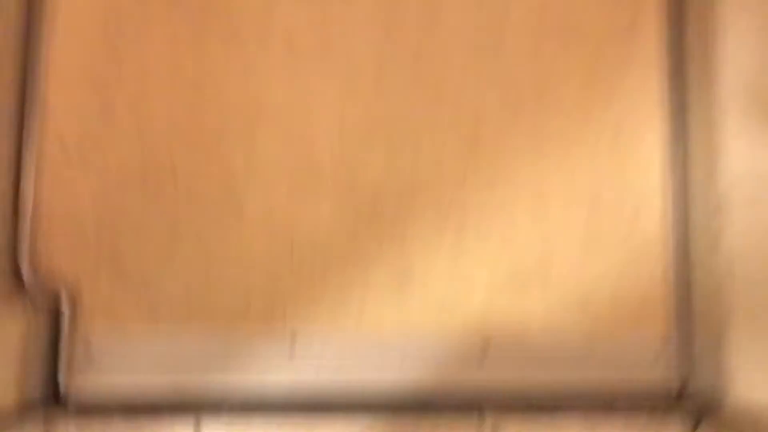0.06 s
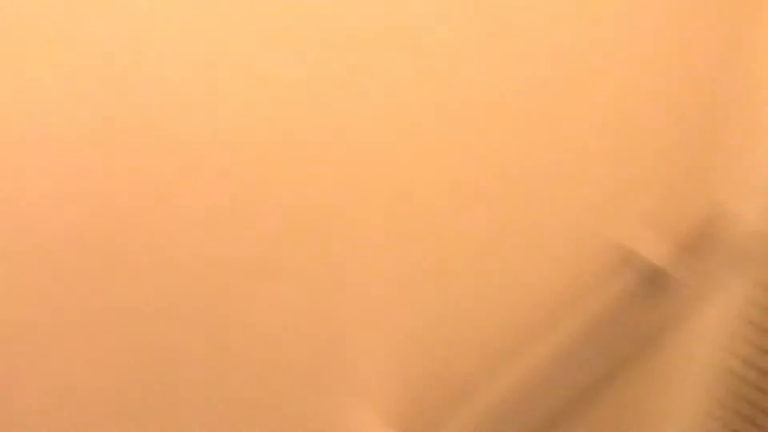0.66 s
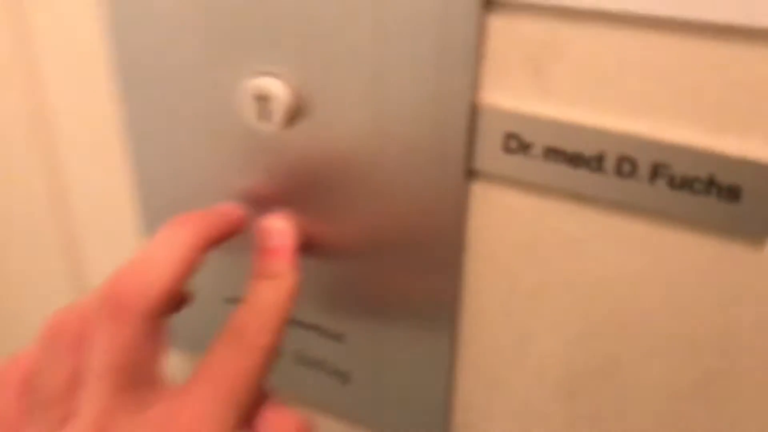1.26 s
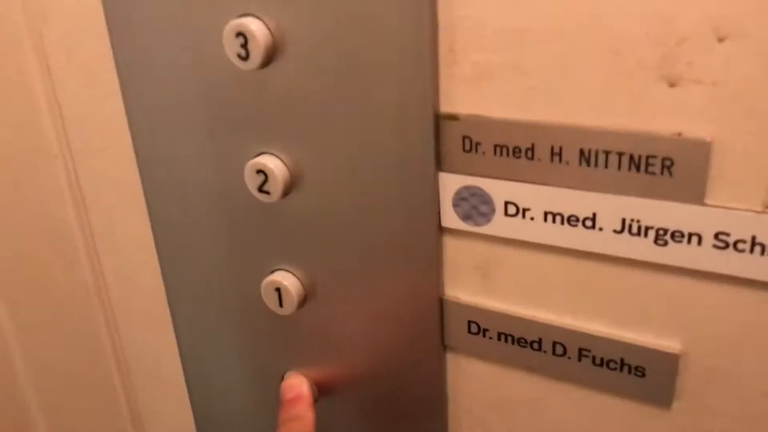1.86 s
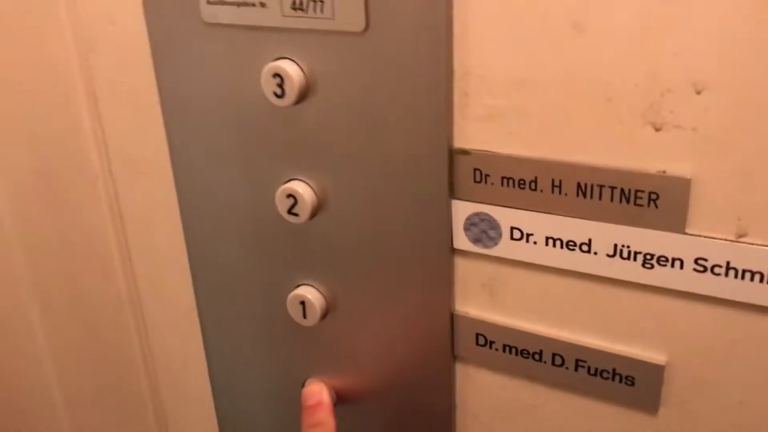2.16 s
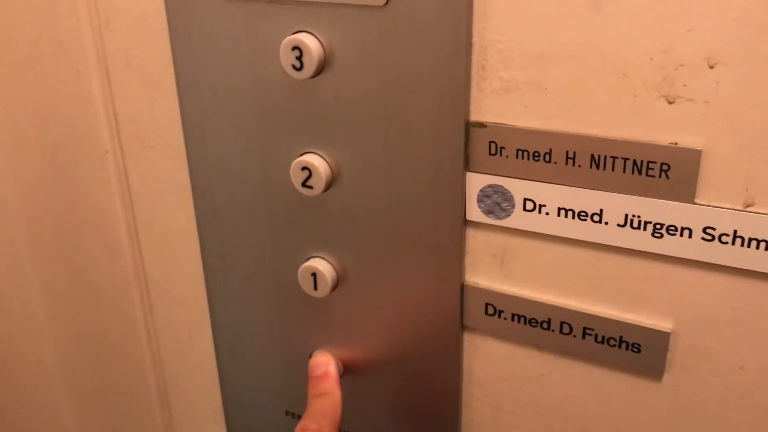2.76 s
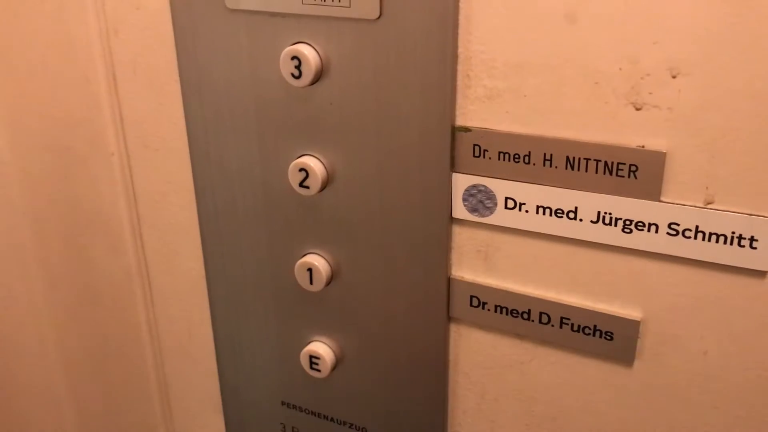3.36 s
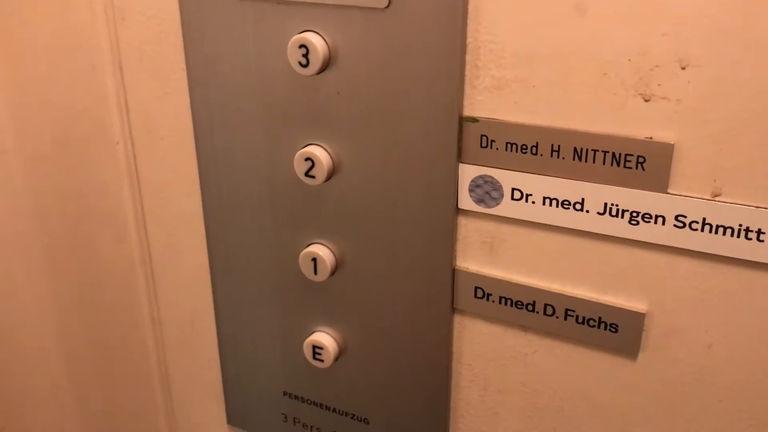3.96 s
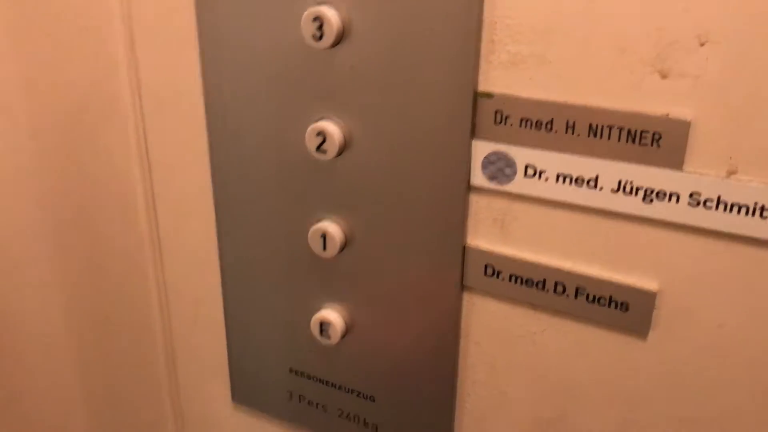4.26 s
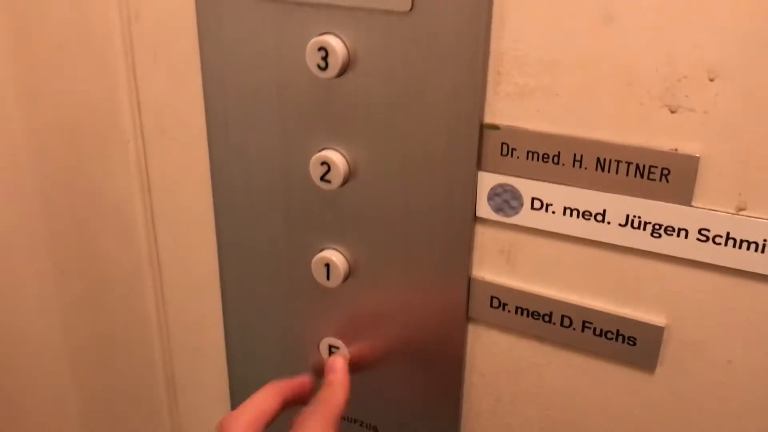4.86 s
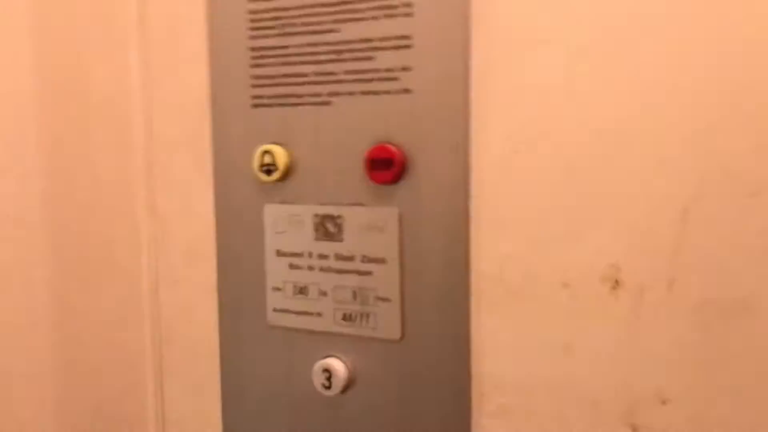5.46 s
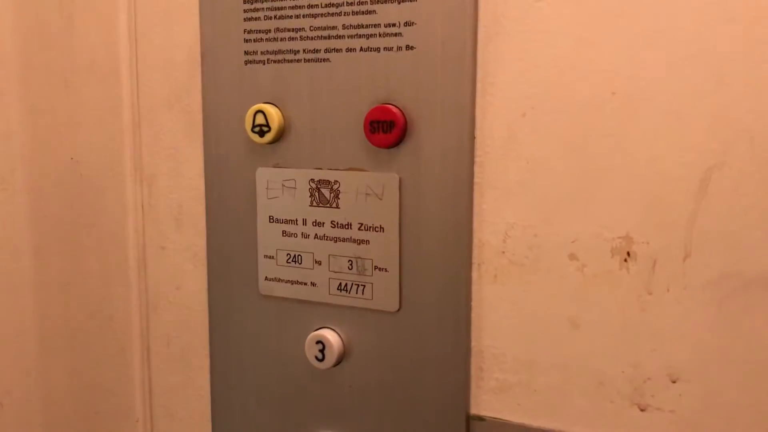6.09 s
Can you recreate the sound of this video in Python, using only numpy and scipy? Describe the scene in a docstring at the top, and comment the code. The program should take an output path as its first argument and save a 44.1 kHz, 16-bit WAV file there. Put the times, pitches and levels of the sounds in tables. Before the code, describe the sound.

Someone steps into a rattling lift cab and clicks buttons before it starts with a metallic crash and a surging low hum.

```python
"""The hoist motor of a small old lift hums in surges as the brake lets go with a crash and the cab starts.
Before that, someone steps in: the hanging cab booms, floor boards rattle, soles and a sleeve rub.
Buttons and shoes click, a relay ticks and the door lock clanks. Blows are decaying band noise
shaped by resonances, ringing on in the cab and the shaft; the boom and the walls are decaying sines."""
import sys
import numpy as np
from scipy import signal
from scipy.io import wavfile
from scipy.ndimage import uniform_filter1d

SR = 44100
rng = np.random.default_rng(int(sys.argv[2]) if len(sys.argv) > 2 else 0)


def wav_out(sig):
    """Save sig, one row per channel (or a flat mono array), as 16-bit PCM at SR to the path in sys.argv[1]."""
    wavfile.write(sys.argv[1], SR, np.round(np.clip(np.atleast_2d(sig).T, -1, 1) * 32767).astype(np.int16))


N = 274433
T = np.arange(N) / SR
STEP = 16   # samples per envelope step
BAND_HZ = 16000 / 2 ** (np.arange(27, -1, -1) / 3)
# Frequencies at which a contact's tone is given, in Hz.
TONE_HZ = [250, 800, 2500, 7000, 13000]


def from_db(db):
    """Decibels to gain."""
    return 10 ** (np.asarray(db) / 20)


def rms_one(x):
    """Scale to rms 1."""
    return x / np.sqrt(np.mean(x ** 2) + 1e-20)


def add(out, start_s, sound):
    """Mix a sound in from a given time."""
    at = max(round(start_s * SR), 0)
    out[at:at + len(sound)] += sound[:N - at]


def per_band(points):
    """A curve over frequency, read at the band centres, as a column."""
    hz, value = np.transpose(list(points))
    return np.interp(np.log(BAND_HZ), np.log(hz), value)[:, None]


def noise_bands():
    """Third-octave bands of noise, rms 1 each; neighbours are unrelated."""
    white = rng.standard_normal((2, N))
    edge = 2 ** (1 / 6)
    filters = [signal.butter(2, [hz / edge, hz * edge], "band", fs=SR, output="sos") for hz in BAND_HZ]
    return np.array([rms_one(signal.sosfilt(sos, white[k % 2])) for k, sos in enumerate(filters)])


def coloured(noise, spectrum):
    """Steady noise of rms 1, shaped by a spectral density in dB."""
    gains = from_db(per_band(spectrum))[:, 0] * np.sqrt(BAND_HZ)
    return rms_one(gains @ noise)


def resonate(x, hz, width_hz):
    """One resonance, peak gain 1."""
    return signal.lfilter(*signal.iirpeak(hz, hz / width_hz, fs=SR), x)


def body(x, resonances):
    """An object's resonances and the hollows between them."""
    for hz, width_hz, lift_db in resonances:
        x = x + (from_db(lift_db) - 1) * resonate(x, hz, width_hz)
    return x


def ring(hz, db, t60_s):
    """One struck mode: a decaying sine."""
    t = T[:3 * SR]
    return from_db(db - 60 * t / t60_s) * np.sin(2 * np.pi * hz * t)


def waver(depth_db, step_s=0.06):
    """A gain that wanders at random."""
    steps = rng.standard_normal(400)
    return from_db(depth_db * np.interp(T / step_s, np.arange(len(steps)), steps))


def grain(depth_db, samples):
    """A gain that flickers quickly."""
    return from_db(depth_db * rms_one(uniform_filter1d(rng.standard_normal(N), size=samples)))


def crackle(per_s, size_db, decay_s=0.002):
    """Small catches in a rubbing contact: a gain that spikes at random moments."""
    catches = (rng.random(N) < per_s / SR) * rng.uniform(0.4, 1, N)
    spikes = signal.lfilter([1], [1, -np.exp(-1 / (decay_s * SR))], catches + 1e-18)
    return from_db(size_db) * spikes


def since(start_s):
    """Seconds since an event, per envelope step; zero before it."""
    return np.maximum(T[::STEP] - start_s, 0)


def dying(age_s, t60_s, rise_s):
    """Power of a sound that builds up and dies away."""
    attack = 1 - np.exp(-age_s / rise_s)
    return attack ** 2 * np.exp(-np.minimum(np.log(1e6) * age_s / t60_s, 60))


def strokes(rows, attack_s, release_t60_s, sag_db_per_s=0):
    """Gain of a run of strokes: each swells, holds or sags for its length, then dies away."""
    power = 0
    for start_s, length_s, db in rows:
        age_s = since(start_s)
        fall_db = sag_db_per_s * age_s + 60 * np.maximum(age_s - length_s, 0) / release_t60_s
        attack = np.minimum(age_s / attack_s, 1)
        power = power + (from_db(db - np.minimum(fall_db, 200)) * attack) ** 2
    return np.interp(T, T[::STEP], np.sqrt(power))


def reflections(noise, power):
    """Dense reflections: noise follows a power envelope per band, grainier in the treble."""
    uneven = rms_one(grain(depth_db=2, samples=24))
    out, shift = np.zeros(N), rng.integers(N)
    for hz, band, gain in zip(BAND_HZ, noise, np.sqrt(power)):
        out += np.roll(band, shift) * np.repeat(gain, STEP)[:N] * (uneven if hz > TONE_HZ[2] else 1)
    return out


def contact_power(tone_db, bass_hz=130):
    """Power per band of a contact, falling away in the bass."""
    return from_db(per_band(zip(TONE_HZ, tone_db))) ** 2 / (1 + (bass_hz / BAND_HZ[:, None]) ** 4)


# Shaft reverberation. Each row: frequency in Hz, t60 in seconds.
SHAFT_T60 = [(100, 0.73), (400, 1.73), (1100, 1.15), (3000, 0.77), (7500, 0.49), (14000, 0.42)]

def blow(start_s, t60_s, rise_s, tone_db, shaft_db, damping):
    """Power per band: a decay in the cab, shorter in the treble, then the shaft's tail."""
    age_s = since(start_s)
    cab = dying(age_s, t60_s * (BAND_HZ[:, None] / TONE_HZ[2]) ** -damping, rise_s)
    shaft = from_db(shaft_db) ** 2 * dying(age_s, per_band(SHAFT_T60), rise_s=0.085)
    return contact_power(tone_db) * (cab + shaft)


def clanks(noise, hits, resonances, shaft_db, damping):
    """Blows heard through the resonances of what they strike."""
    power = sum(blow(start_s, t60_s, rise_s, tone_db, shaft_db, damping)
                for start_s, t60_s, rise_s, *tone_db in hits)
    return body(reflections(noise, power), resonances)


# Wall echoes. Each row: delay in seconds, gain in dB.
ECHOES = [(.0123, -14), (.0191, -13), (.0263, -14), (.0347, -16)]

def wall_echoes(x):
    """The close walls throw each blow back with a boxy ring, at about the same power."""
    out = x.copy()
    for delay_s, db in ECHOES:
        add(out, delay_s, from_db(db) * x)
    return out / np.sqrt(1 + sum(from_db(db) ** 2 for _, db in ECHOES))


# Air spectrum. Each row: frequency in Hz, relative density in dB.
AIR_SPECTRUM = [(18, -33), (30, 10), (64, -10), (109, -14), (170, -21.5), (239, -3.5), (273, -22),
                (889, -44), (1010, -36), (1100, -19), (7670, -32.5), (12600, -35), (16000, -56)]

def air(noise, level_db=-61.5):
    """The still air of the stairwell and shaft."""
    return from_db(level_db) * np.roll(coloured(noise, AIR_SPECTRUM), SR)


# Guide shoe spectrum. Each row: frequency in Hz, relative density in dB.
GUIDE_SPECTRUM = [(100, -21), (170, -2.5), (331, -7), (371, -10), (475, -10), (512, -10.5), (668, -7),
                  (1050, -11.5), (1730, -25.5), (2530, -27), (4150, -24.5), (8540, -30.5), (16000, -44)]
# Cab rumble, also used by thumps. Each row: frequency in Hz, relative third-octave level in dB.
RUMBLE_SPECTRUM = [(25, -22.5), (40, -6.5), (60, 2.5), (85, 9), (115, -15), (160, -31), (300, -59),
                   (600, -90)]

def travel(noise, depart_s=5.01, shoes_db=-53, rumble_db=-51):
    """Guide shoes rub unevenly on the rails and the cab rumbles, both growing with its speed."""
    speed = np.maximum(T - depart_s, 0)   # the levels apply one second after departure
    shoes = coloured(noise, GUIDE_SPECTRUM) * waver(depth_db=-0.3) * (1 + crackle(per_s=8.8, size_db=-1))
    rumble = rms_one(from_db(per_band(RUMBLE_SPECTRUM))[:, 0] @ noise)
    return speed * (from_db(shoes_db) * shoes + from_db(rumble_db) * rumble)


# Strokes of sleeve, fingers and soles. Each row: start in seconds, length in seconds, level in dB.
SLEEVE_STROKES = [(.94, 0.13, -52.5), (1.05, 0.4, -44.5)]
FINGER_STROKES = [(.96, 0.13, -49), (1.045, .08, -41), (1.13, .15, -49), (1.91, 0.039, -68),
                  (2.03, 0.038, -60)]
SOLE_STROKES = [(-.05, 0.33, -50), (.3, 0.36, -45.5), (.75, 1.08, -55), (2.27, 0.08, -63),
                (2.96, 0.099, -65), (3.32, 0.052, -59), (3.44, 0.033, -60.5), (4.17, 0.039, -59),
                (4.41, 0.12, -57)]
# Their friction spectra. Each row: frequency in Hz, relative density in dB.
CLOTH_SPECTRUM = [(290, -19), (500, -3.5), (708, -4.5), (784, -3), (880, -11), (1060, 1), (2010, -3.5),
                  (6330, -6), (11800, -17), (16000, -28)]
SKIN_SPECTRUM = [(2000, -34), (4000, -0.5), (6200, 3.5), (9000, -3.5), (12000, -1), (16000, -20)]
SOLE_SPECTRUM = [(76, -38.5), (130, -8.5), (169, -20), (511, -24.5), (692, -24), (974, -25), (1060, -24.5),
                 (1710, -32.5), (6340, -42), (10500, -49.5), (14800, -52), (16000, -51.5)]

def rubbing(noise, stir_db=-68):
    """A sleeve brushes past, fingers slide on the panel and soles shuffle, never quite still."""
    texture = grain(depth_db=-0.5, samples=200)
    hiss = np.roll(coloured(noise, SKIN_SPECTRUM), -SR)
    sleeve = strokes(SLEEVE_STROKES, attack_s=0.018, release_t60_s=0.36) * coloured(noise, CLOTH_SPECTRUM)
    fingers = strokes(FINGER_STROKES, attack_s=0.0096, release_t60_s=0.13) * hiss
    sole_gain = strokes(SOLE_STROKES, attack_s=0.035, release_t60_s=0.46) + from_db(stir_db)
    scuff = coloured(noise[:, ::-1], SOLE_SPECTRUM) + crackle(per_s=18, size_db=-2) * hiss
    return texture * (sleeve + fingers + sole_gain * scuff)


# Squeaks. Each row: middle in seconds, half length in seconds, pitch in Hz, width in Hz, level in dB.
SQUEAKS = [(0.198, 0.024, 543, 59.7, -46), (0.205, 0.026, 1090, 250, -49), (0.991, 0.022, 6500, 1100, -47),
           (1.42, 0.013, 523, 39.8, -41), (3.895, 0.11, 3460, 447, -62), (3.098, 0.012, 3150, 110, -48.5),
           (4.732, 0.0061, 3140, 150, -38), (4.783, 0.04, 2440, 600, -45.5),
           (4.981, 0.013, 2040, 252, -27.5)]

def squeaks():
    """Brief friction of soles, cloth or sliding metal excites one narrow resonance."""
    out = np.zeros(N)
    for middle_s, half_s, hz, width_hz, db in SQUEAKS:
        swell = np.exp(-np.minimum(((T - middle_s) / half_s) ** 2 / 2, 50))
        rub = resonate(resonate(rng.standard_normal(N), hz, width_hz), hz, width_hz) * swell
        out += from_db(db) * rub * np.sqrt(np.sum(swell ** 2) / np.sum(rub ** 2))
    return out


# Relay tick. Each row: start, t60 and rise in seconds, then level in dB at each TONE_HZ.
RELAY_HITS = [(2.550, 0.29, 0.0012, -79, -64, -59.5, -76, -59.5)]
# Relay resonances. Each row: frequency in Hz, width in Hz, lift in dB.
RELAY_BODY = [(1310, 47, 19), (1493, 29, 15.5), (2150, 52, 9.5), (2835, 70, 16), (3570, 700, -17),
              (6170, 360, 11.5), (8770, 170, 22), (9160, 200, 8), (10200, 300, 12.5), (13700, 200, 8)]
# Spring modes. Each row: frequency in Hz, level in dB, t60 in seconds.
RELAY_SPRING = [(1320, -58, 0.38), (2850, -62, 0.51), (8900, -61, .45)]

def relay(noise):
    """A relay ticks and its spring rings on."""
    out = clanks(noise, RELAY_HITS, RELAY_BODY, shaft_db=-14.5, damping=0.12)
    for start_s, *_ in RELAY_HITS:
        add(out, start_s, sum(ring(*mode) for mode in RELAY_SPRING))
    return out


# Clicks of buttons, fingers and shoes. Each row: start in seconds, t60 in seconds, relative crack in dB,
# level in dB, tilt in dB per octave, bite (favoured band) in Hz, its lift in dB.
CLICKS = [ (0.898, 0.29, -1, -60.5, -5, 1200, -2), (0.907, 0.094, 5, -54.5, 1, 1320, 9),
          (1.119, 0.057, 4, -49.5, 0, 6000, 7), (1.128, 0.057, 7, -44, -1, 4000, 7.5),
          (1.399, .1, 4, -47.5, -1.5, 1180, 3), (1.800, 0.088, -2, -86, -1, 7060, 6.5),
          (1.912, 0.61, -4, -68, -3, 9600, 11), (2.029, 0.23, 4, -74, 1.5, 6840, 9),
          (3.054, .45, 0.5, -65.5, -3, 2540, 6), (3.072, 0.26, -5, -55.5, 4, 7800, 5.5),
          (3.082, 0.28, 8.5, -56, -1.5, 1500, 4.5), (4.118, 0.096, -3, -79, 2, 9150, 6),
          (4.620, 0.24, -1.5, -44.5, 1, 4700, 7), (4.624, .05, 5, -46, 3, 4570, 7.5),
          (4.683, 0.26, 0, -56, -1.5, 5500, 9), (4.723, 0.14, 4, -56.5, -1.5, 3500, 9),
          (4.738, 0.21, 7.5, -52.5, -0.5, 5530, 13.5), (4.765, 0.18, 7.5, -49.5, -1, 4360, 7)]
# Tone shared by all clicks: relative level in dB at each TONE_HZ.
CLICK_TONE_DB = [-6.5, -3, 2, 0.5, -1]
# Metallic ring of the clicks. Each row: frequency in Hz, width in Hz, lift in dB.
CLICK_BODY = [(325, 12, 7), (494, 20, 3), (800, 29, 6.5), (925, 20, -0.5), (1070, 82, 6.5), (1250, 47, 4),
              (1820, 71, -11), (2320, 60, 2.5), (3140, 45, 10.5), (3600, 220, -1.5), (3950, 130, 6),
              (5100, 35, -7), (5930, 90, 8.5), (6860, 120, 4), (9000, 830, 7), (10500, 610, 2),
              (13100, 650, -13)]

def clicks(noise, bite_half_width_oct=0.3):
    """Sharp near clicks with a metallic ring: a direct crack, then the cab's reflections."""
    power, octaves = 0, np.log2(np.divide(TONE_HZ, TONE_HZ[2]))
    for start_s, t60_s, crack_db, db, tilt_db_per_oct, bite_hz, bite_db in CLICKS:
        tone_db = db + np.array(CLICK_TONE_DB) + tilt_db_per_oct * octaves
        off_centre = np.log2(BAND_HZ[:, None] / bite_hz) / bite_half_width_oct
        bite = from_db(bite_db * np.exp(-0.5 * off_centre ** 2))
        crack = from_db(crack_db) ** 2 * dying(since(start_s), t60_s=0.018, rise_s=0.0001)
        tail = blow(start_s, t60_s, rise_s=0.0016, tone_db=tone_db, shaft_db=-12, damping=0.3)
        power = power + bite ** 2 * (contact_power(tone_db) * crack + tail)
    return body(reflections(noise, power), CLICK_BODY)


# Lock blows. Each row: start, t60 and rise in seconds, then level in dB at each TONE_HZ.
LOCK_HITS = [ (3.682, 0.038, 0.00023, -79, -60, -48, -49, -64),
             (3.684, 0.44, 0.0028, -78, -60.5, -54, -50, -60),
             (3.765, 0.71, 0.0079, -65, -58.5, -49.5, -49, -60.5)]
# Lock resonances. Each row: frequency in Hz, width in Hz, lift in dB.
LOCK_BODY = [(324, 11, 20.5), (560, 22, 7), (666, 9.7, 11.5), (796, 150, 5.5), (1010, 120, 5),
             (1160, 50, 1.5), (1995, 56, 8), (2300, 570, -11), (2940, 64, -1), (3430, 140, 6),
             (3750, 110, 9.5), (4300, 230, 3.5), (4800, 200, -15), (5860, 290, 4.5), (7060, 94, 8.5),
             (12000, 1000, 8.5)]

def door_lock(noise):
    """The lock's lever and bolt clank, with a strong tail in the shaft."""
    return clanks(noise, LOCK_HITS, LOCK_BODY, shaft_db=-3, damping=0.37)


# Switch blows. Each row: start, t60 and rise in seconds, then level in dB at each TONE_HZ.
SWITCH_HITS = [ (5.359, 0.38, 0.0024, -51.5, -46, -48, -47.5, -94),
               (5.431, 0.62, 0.018, -51, -41.5, -45, -52.5, -52.5)]
# Switch gear resonances. Each row: frequency in Hz, width in Hz, lift in dB.
SWITCH_BODY = [(257, 21, 9), (331, 15, 15), (550, 24, 7), (672, 16, 9.5), (833, 88, 5), (1030, 75, 5.5),
               (1850, 82, -9), (2760, 100, -2), (4190, 110, 6.5), (4900, 570, -11), (6100, 180, 12),
               (7150, 190, 4)]

def starting_switch(noise):
    """The starting switch clinks and a second clack follows."""
    return clanks(noise, SWITCH_HITS, SWITCH_BODY, shaft_db=-28, damping=0.21)


# Board knocks. Each row: start, t60 and rise in seconds, then level in dB at each TONE_HZ.
BOARD_HITS = [ (0.349, 0.11, 0.0018, -55, -57, -56, -73, -80),
              (0.479, 0.33, 0.0063, -47, -57, -51, -53.5, -64),
              (0.507, 0.33, 0.0099, -38, -43, -47, -50, -60),
              (0.711, 0.45, 0.0022, -49.5, -59, -62.5, -67, -77),
              (1.494, 0.1, 0.0054, -40.5, -47.5, -58, -63, -80),
              (2.009, 0.38, 0.00072, -60, -54.5, -53.5, -85, -82)]
# Board resonances. Each row: frequency in Hz, width in Hz, lift in dB.
BOARD_BODY = [(115, 20, 9), (254, 27, 6), (950, 120, 7.5), (1260, 220, 8), (1540, 150, 1.5)]

def floor_boards(noise):
    """The boards knock and rattle underfoot."""
    return clanks(noise, BOARD_HITS, BOARD_BODY, shaft_db=-13.5, damping=0.31)


# Low thumps of the cab, from footsteps and from jolts as it locks and starts. Each row: start and rise
# in seconds, boom in Hz, boom level in dB, rumble gain in dB, rumble t60 in seconds, wall gain in dB.
THUMPS = [ (0.000, 0.0087, 68.5, -50.5, -50.5, 0.62, -73), (0.448, 0.0018, 82, -33.5, -33, 1.15, -35.5),
          (0.640, 0.0069, 81.66, -32, -41, 3.5, -40), (1.075, 0.016, 83, -46, -55, 2.3, -32),
          (1.159, 0.0054, 42.8, -45, -46.5, 2.4, -35.5), (1.494, 0.0023, 106, -40.5, -52, 6.9, -38),
          (3.766, 0.0028, 63.7, -40.5, -47, 1.2, -53.5), (3.958, 0.0088, 63.3, -48, -49.5, 2.8, -69),
          (4.997, 0.0029, 60.4, -29.5, -39, 2.8, -40.5), (5.100, .003, 64.7, -32, -44, 2.3, -35)]
# Cab wall modes. Each row: frequency in Hz, relative level in dB, t60 in seconds.
WALL_MODES = [(114.2, -5, 3), (162.4, -20, 1.6), (173.2, -10, 1.7), (196, -3.5, 0.36), (233.8, 1, 0.32),
              (249.3, -7, 0.68), (268.6, 1, 0.15), (330, -4, 0.59), (385, -10, 0.23), (474, -20, 0.83)]

def thumps(noise, boom_t60_s=1.85, spread_db=1.5):
    """The hanging cab booms with the air of the shaft; its walls ring a little differently each time."""
    out, power = np.zeros(N), 0
    for start_s, rise_s, boom_hz, boom_db, rumble_db, rumble_t60_s, wall_db in THUMPS:
        boom = np.sqrt(2) * ring(boom_hz, boom_db, boom_t60_s)
        walls = sum(ring(hz, wall_db + db + spread_db * rng.standard_normal(), t60_s)
                    for hz, db, t60_s in WALL_MODES)
        add(out, start_s, (boom + walls) * np.minimum(T[:len(walls)] / rise_s, 1))
        power = power + from_db(rumble_db) ** 2 * dying(since(start_s), rumble_t60_s, rise_s=0.0091)
    return out + reflections(noise, from_db(per_band(RUMBLE_SPECTRUM)) ** 2 * power)


# Brake blows. Each row: start, t60 and rise in seconds, then level in dB at each TONE_HZ.
BRAKE_HITS = [ (4.902, 1, 0.026, -44.5, -46, -51, -53, -62), (4.944, 0.2, 0.004, -53, -59, -48, -37.5, -35),
              (4.964, 0.34, 0.0013, -54, -36, -38.5, -38.5, -55),
              (4.962, 0.023, 0.00036, -46, -38.5, -33, -27, -38),
              (5.001, 0.23, .001, -44, -35, -36, -40, -43.5),
              (5.020, 0.31, 0.003, -41.5, -34, -54, -69, -77)]
# Steelwork resonances. Each row: frequency in Hz, width in Hz, lift in dB.
FRAME_BODY = [(200, 20, 4), (340, 18, 3), (410, 14, 6), (472, 28, 9), (562, 18, 5), (628, 22, 6),
              (717, 18, 6), (1028, 22, 9), (1197, 28, 6), (1745, 55, 5), (1985, 70, 9), (2950, 400, -5),
              (3380, 180, 5), (3630, 140, 5), (5195, 45, 9), (5480, 220, -4), (6070, 140, 8),
              (7150, 100, 5)]

def brake(noise):
    """The brake lets go and shakes the cab's steel frame."""
    return clanks(noise, BRAKE_HITS, FRAME_BODY, shaft_db=-16, damping=0.27)


# Surges as the hoist takes the load. Each row: start in seconds, length in seconds, level in dB.
SURGES = [(4.775, 0.12, -40.5), (4.895, 0.23, -22), (5.185, 0.23, -26), (5.54, 0.058, -30),
          (5.68, 0.65, -27.5)]
# Hum harmonics. Each row: multiple of the hum frequency, relative level in dB.
HUM_HARMONICS = [(1, -2), (2, -32), (4, -41)]

def hoist_motor(hum_hz=100.2, idle_hz=102.5, idle_db=-59.5):
    """The hoist hums at twice the mains rate, easing as the load gives way, over a faint idle hum."""
    surges = strokes(SURGES, attack_s=0.026, release_t60_s=0.073, sag_db_per_s=7.5)
    hum = sum(from_db(db) * np.sin(2 * np.pi * k * hum_hz * T) for k, db in HUM_HARMONICS)
    idle = from_db(idle_db) * np.sin(2 * np.pi * idle_hz * T)
    return np.sqrt(2) * (waver(depth_db=1.1) * surges * hum + idle)


def scene():
    """Everything as heard inside the cab, in mono."""
    noise = noise_bands()
    blows = floor_boards(noise) + brake(noise) + door_lock(noise) + starting_switch(noise)
    blows += clicks(noise)
    impacts = wall_echoes(blows) + relay(noise) + thumps(noise)
    return (impacts + squeaks() + rubbing(noise) + travel(noise) + air(noise) + hoist_motor())[None]


def record(dry, dip_hz=10700, dip_width_hz=1400, dip_share=0.29, cutoff_hz=16000):
    """The microphone has a dip in the treble; the top is cut."""
    heard = dry - dip_share * resonate(dry, dip_hz, dip_width_hz)
    return signal.sosfilt(signal.ellip(10, 0.2, 80, cutoff_hz, fs=SR, output="sos"), heard)


dry = scene()
out = record(dry)
wav_out(out)
```